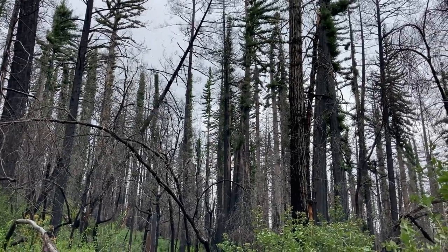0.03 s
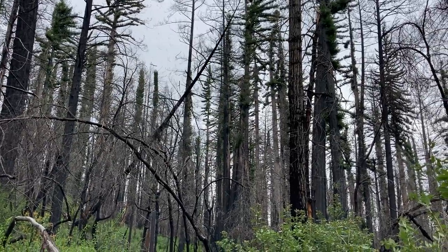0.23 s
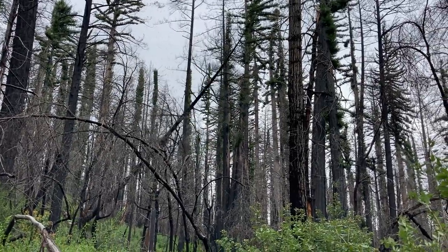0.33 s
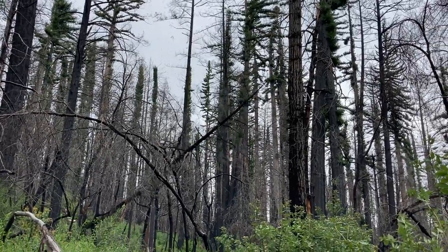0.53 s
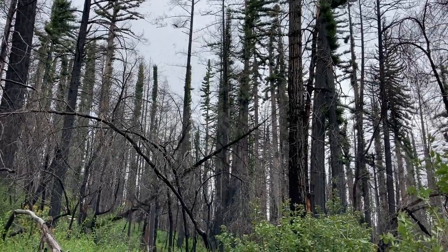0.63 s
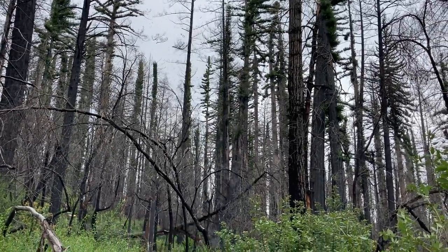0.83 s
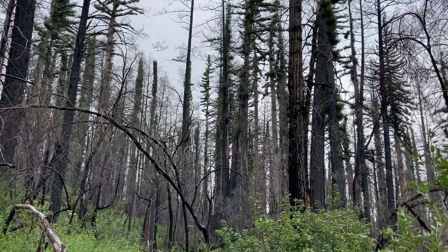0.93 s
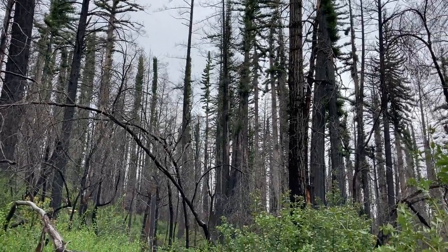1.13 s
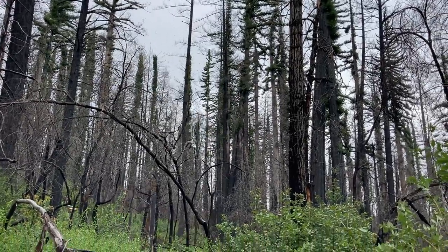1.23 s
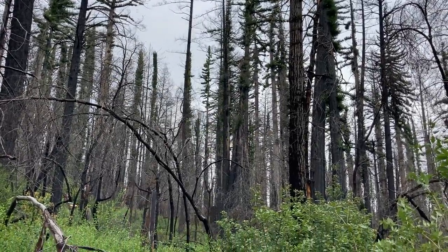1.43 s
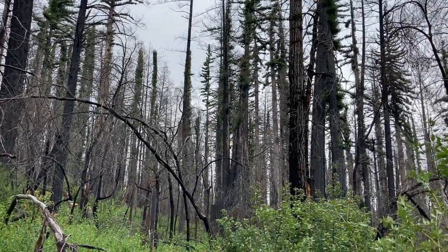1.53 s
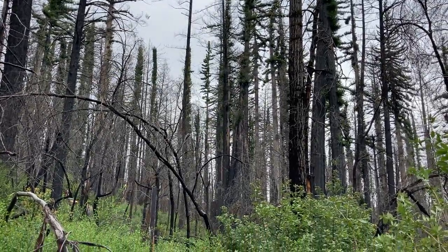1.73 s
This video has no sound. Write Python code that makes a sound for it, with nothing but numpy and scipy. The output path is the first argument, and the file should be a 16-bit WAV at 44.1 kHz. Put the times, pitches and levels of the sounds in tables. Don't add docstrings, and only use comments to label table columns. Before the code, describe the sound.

A dead tree falls in a forest. Faint rustling and small snaps open it; from 0.2 seconds cracks thicken, loudest and sharpest around 0.38 and 0.54, with hollow trunk knocks. Crackling brush continues; branches break again from 0.74, strongly near 0.9. At about 1.2 the trunk lands with a deep thud, bounces duller until 1.5, then fades into soft rustle. Short woodland echo, left-weighted stereo.

```python
import sys
import numpy as np
from scipy import signal
from scipy.fft import rfft, irfft, next_fast_len
from scipy.io import wavfile
from scipy.ndimage import uniform_filter1d

SR = 44100
rng = np.random.default_rng(int(sys.argv[2]) if len(sys.argv) > 2 else 0)


def unload_audio(sound):
    columns = np.transpose(np.atleast_2d(sound))
    steps = np.round(np.clip(columns, -1, 1) * 32767)
    wavfile.write(sys.argv[1], SR, steps.astype(np.int16))


def to_linear_factor(level_db):
    exponent = np.asarray(level_db, float) / 20
    return 10 ** exponent


N = 79380


def evened(x):
    return x / np.sqrt(np.mean(x ** 2) + 1e-20)


def read(points, hz):
    f, value = np.transpose(points)
    return np.interp(np.log(hz + 1), np.log(f + 1), value)


def add(mix, s, sound):
    part = mix[round(s * SR):][:len(sound)]
    part += sound[:len(part)]


def colour(x, gain):
    size = next_fast_len(N + 4096)
    hz = np.fft.rfftfreq(size, 1 / SR)
    return irfft(rfft(x, size) * gain(hz), size)[..., :N]


# t/s, brush crackle level/dB, brightness level/dB, trunk groan level/dB
FALL_COURSE = [(0, -41, -3, -42.5), (0.168, -39.5, 0, -41), (0.219, -31, 3, -38.5), (.32, -31, 6.5, -33.5),
               (.45, -29, 4, -45), (.66, -27, -0.5, -40), (.79, -32, 2, -43.5), (.85, -27, 4, -28),
               (.97, -32, 5, -37), (1.02, -32, 8, -32.5), (1.169, -23, -0.5, -30.5),
               (1.208, -23.5, 0.5, -13), (1.29, -28.5, 1, -51), (1.4, -29, -6, -31.5),
               (1.582, -33.5, -7, -28), (1.8, -41.5, -6.5, -35.5)]


def control(axis):
    table = np.array(FALL_COURSE)
    return np.interp(np.arange(N) / SR, table[:, 0], table[:, axis])


# f/Hz, level/dB
BRUSH_SPECTRUM = [(60, -16), (250, 7), (900, 5.5), (2500, -1.5), (4200, -12), (6000, -21.5), (12000, -28.5),
                  (16000, -47)]
BRUSH_DB, RUSTLE_DB, USUAL_BRIGHT_DB, CLUMP_DB = 5, 3, -11, 1.6
TWIGS_PER_S, TWIG_SPREAD_DB, TWIG_CYCLES = 4000, 3.0, 2.5


def brush():
    clumps = uniform_filter1d(rng.standard_normal(N), 500)
    clumps = evened(uniform_filter1d(clumps, 500))
    size = to_linear_factor(TWIG_SPREAD_DB * np.minimum(rng.exponential(1, N), 3))
    size = size * (rng.random(N) < TWIGS_PER_S / SR)
    kind = rng.integers(0, 24, N)
    t = np.arange(1500) / SR
    twigs = np.zeros(N)
    for k, hz in enumerate(np.geomspace(250, 14000, 24)):
        grain = np.exp(-t * hz / TWIG_CYCLES) * np.sin(2 * np.pi * hz * t)
        grain = grain / np.linalg.norm(grain) * np.sqrt(hz)
        twigs += signal.oaconvolve(size * (kind == k), grain)[:N]
    mix = evened(twigs) + to_linear_factor(RUSTLE_DB) * rng.standard_normal(N)
    full = colour(mix, lambda hz: to_linear_factor(read(BRUSH_SPECTRUM, hz)))
    treble = colour(full, lambda hz: 1 / (1 + (4500 / (hz + 1)) ** 4))
    bright = full + (to_linear_factor(control(axis=2) - USUAL_BRIGHT_DB) - 1) * treble
    return to_linear_factor(BRUSH_DB + control(axis=1) + CLUMP_DB * clumps) * bright / full.std()


# f/Hz, level/dB
GROAN_SPECTRUM = [(25, -9), (50, -10.5), (75, -2.5), (110, -4.5), (200, -6), (320, -8.5), (600, -45.5)]
GROAN_DB = 0.5


def groan():
    rumble = colour(rng.standard_normal(N), lambda hz: to_linear_factor(read(GROAN_SPECTRUM, hz)))
    return to_linear_factor(GROAN_DB + control(axis=3)) * evened(rumble)


SNAP_DB, TICK_DB, TEAR_DB, TICK_S = 1, 6.5, -12.5, 0.00043
SPLINTERS, RING_CYCLES, SPREAD_OCT = 14, 2.3, 1.3


def snap(level_db, ring_hz, treble_db, length):
    luck = rng.random((SPLINTERS, 3))
    hiss = rng.standard_normal(4000)
    t = np.arange(1600) / SR
    body, edge = np.zeros(4000), np.zeros(4000)
    length = np.clip(length, .002, .03)
    for k, (when, size, detune) in enumerate(luck):
        hz = ring_hz * 2 ** (SPREAD_OCT * (detune - .4) * (k % 3 > 0))
        late = (k > 0) * when * length
        force = (.5 + .5 * size) * np.exp(-late / length) * (-1) ** k
        force *= min(0.22 + 4 * late / length, 1)
        ring = np.exp(-t * hz / RING_CYCLES) * np.sin(2 * np.pi * hz * t)
        tick_hz = 3500 + 9000 * detune ** 2.45
        tick = np.exp(-t / TICK_S) * np.sin(2 * np.pi * tick_hz * t)
        add(body, late, force * ring)
        add(edge, late, (force + (k == 0)) * tick)
    u = np.arange(4000) / SR / length
    fade = np.exp(-1.5 * u) * np.minimum(6 * u, 1)
    tear = signal.lfilter([1], [1, -np.exp(-4 * np.pi * ring_hz / SR)], hiss)
    body = body / abs(body).max() + to_linear_factor(TEAR_DB) * evened(tear) * fade
    edge = edge / abs(edge).max() + 0.16 * hiss[::-1] * fade
    return to_linear_factor(level_db + SNAP_DB) * (body + to_linear_factor(treble_db + TICK_DB) * edge)


# t/s, peak level/dB, ring f/Hz, treble level/dB, length/s
LIMB_SNAPS = [(.064, -21.5, 1160, -10, 0.0048), (.105, -34.5, 1490, 3, 0.0078),
              (.144, -33.5, 3570, 2, 0.0046), (.188, -24, 1160, -7.5, 0.0047), (.207, -19, 1140, -5, .01),
              (.254, -12, 2420, -4, 0.007), (.268, -17, 3700, -13, 0.0032), (.28, -24, 4140, -7, 0.0016),
              (.288, -19.5, 3440, 3, 0.0031), (.2975, -11.5, 1080, 2.5, 0.007),
              (.327, -14.5, 2160, -23, 0.006), (.374, -6.5, 1560, -17, 0.0058),
              (.379, -3, 2550, -13.5, 0.0031), (.384, -4, 1600, -14, 0.003), (.388, -9, 2490, -10, .007),
              (.403, -15, 2330, -20, 0.0037), (.44, -11.5, 2230, -12, 0.0044),
              (.488, -23, 1500, -11, 0.0044), (.4975, -16.5, 2320, -4, 0.0029),
              (.4995, -13, 2070, -30, 0.0032), (.5377, -12.5, 2400, 0, .002), (.539, -3, 1937, -21, 0.008),
              (.554, -13, 2370, -36, 0.0047), (.62, -8.5, 1270, -36, 0.011), (.648, -11, 2040, -16, .004),
              (0.74, -16, 3000, -34, 0.0045), (0.806, -15, 1320, -15, 0.0063),
                 (0.847, -15, 1340, -11.5, 0.013), (.864, -16, 1670, -13, 0.0033),
                 (0.885, -5, 1500, -11, 0.0033), (0.906, -6, 1870, -29, .011),
                 (0.932, -14, 1160, -19, 0.0087), (0.962, -12, 2240, -8, 0.003),
                 (0.972, -9, 2010, -30, 0.0039), (0.978, -14.5, 1380, -14, 0.0065),
                 (0.99, -13.5, 1960, -8, 0.0047), (1.034, -15, 3000, -29, 0.005),
                 (1.058, -13, 1840, -22, 0.0056), (1.063, -12, 1110, -10, 0.0066),
                 (1.09, -16, 1640, -28, 0.0068), (1.13, -11, 900, -29, 0.01),
                 (1.163, -13.5, 1120, -34, .01), (1.175, -8, 2230, -32, 0.0083),
                 (1.187, -3.5, 1830, -40, 0.0066), (1.2, -5, 915, -42, 0.00813),
                 (1.217, -10.5, 1080, -27, 0.013), (1.258, -11.5, 1870, -25, 0.0078),
                 (1.306, -13, 800, -28, 0.0167), (1.397, -13.5, 1270, -28, 0.00397),
                 (1.6252, -17.5, 1850, -23, .005)]


def breaking_limbs():
    limbs = np.zeros(N)
    for s, *settings in LIMB_SNAPS:
        add(limbs, s, snap(*settings))
    return limbs


THUD_DB, THUD_OVERTONE = 2, 0.19
THUD_SAG, THUD_WOBBLE, THUD_LUMP_DB = .06, .08, 1.5


def blow(level_db, pitch_hz, length):
    u = np.arange(0, length, 1 / SR) / length
    luck = rng.standard_normal((32, 2))
    cycle = u * length * pitch_hz
    wobble, lumps = (np.interp(cycle, np.arange(len(row)), row) for row in luck.T)
    pitch = pitch_hz * (1 + THUD_SAG * (1 - 2 * u) + THUD_WOBBLE * wobble)
    turns = np.cumsum(pitch) / SR
    wave = np.sin(2 * np.pi * turns) - THUD_OVERTONE * np.cos(4 * np.pi * turns)
    swell = abs(np.sin(np.pi * u)) ** 0.68
    return to_linear_factor(level_db + THUD_DB + THUD_LUMP_DB * lumps) * swell * wave


# t/s, peak level/dB, pitch f/Hz, length/s
TRUNK_KNOCKS = [(.197, -22, 332, 0.019), (.21, -24, 279, 0.022), (.256, -21.5, 291, 0.02),
                (.284, -24.5, 296, 0.026), (.298, -18, 254, 0.021), (.3, -27, 81.4, 0.04),
                (.328, -21, 192, 0.015), (.357, -23, 219, 0.025), (0.374, -13, 300, 0.019),
                (.388, -21.5, 121, 0.026), (.393, -20, 304, 0.019), (.41, -15.5, 253, 0.022),
                (.4175, -6, 758, 0.0049), (.455, -23, 209, 0.031), (.479, -20, 186, 0.019),
                (0.4988, -15.5, 1284, .006), (0.506, -22.5, 114, 0.034), (.565, -25.5, 83, 0.037),
                (.61, -26, 192, .018), (.64, -22.5, 292, 0.031), (.671, -25, 286, 0.017),
                (.68, -29, 88, 0.037), (.73, -27.5, 70.5, 0.047), (.797, -26, 74.4, 0.026),
                (.83, -26, 443, 0.016), (.84, -21, 111, 0.016), (.883, -21.5, 272, 0.013),
                (.9, -25, 295, 0.021), (.928, -24.5, 400, 0.027), (.978, -33, 165, 0.026)]


def knocks():
    trunk = np.zeros(N)
    for s, *settings in TRUNK_KNOCKS:
        add(trunk, s, blow(*settings))
    return trunk


# t/s, peak level/dB, pitch f/Hz, length/s
GROUND_THUDS = [(1.115, -23, 96, 0.031), (1.139, -19, 114, 0.03), (1.161, -20, 78, 0.024),
                (1.185, -15, 108, .02), (1.19, -14, 357, .022), (1.207, -12, 167, 0.012),
                (1.217, -11.5, 117, .018), (1.227, -8, 283.6, 0.0185), (1.231, -7, 193, 0.0192),
                (1.244, -5.5, 95.7, 0.027), (1.255, -13, 171, 0.012), (1.279, -10, 60, .03),
                (1.315, -22.5, 177, 0.029), (1.329, -15.5, 88.5, 0.017), (1.358, -11, 97, 0.02),
                (1.379, -11.5, 79.4, 0.0205), (1.428, -12.5, 91, 0.028), (1.458, -29, 73, 0.03),
                (1.482, -20.5, 68, 0.034), (1.518, -17.5, 75, 0.034), (1.581, -25.5, 67.4, .055),
                (1.678, -30.5, 100, 0.043), (1.708, -26.5, 62, .036), (1.75, -32.5, 97, 0.048)]


def thuds():
    trunk = np.zeros(N)
    for s, *settings in GROUND_THUDS:
        add(trunk, s, blow(*settings))
    return trunk


# f/Hz, t/s
FOREST_DECAY = [(100, 0.63), (1000, 0.64), (4000, 0.57), (12000, 0.48)]


def forest(x):
    taps = np.zeros((2, SR // 2))
    at = np.arange(200, SR // 2 - 20, 20)
    at = at + rng.integers(0, 20, (2, len(at)))
    np.put_along_axis(taps, at, rng.choice([-1., 1.], at.shape), 1)
    hz, t, z = signal.stft(taps, SR, nperseg=256)
    decay = to_linear_factor(-60 * t / read(FOREST_DECAY, hz)[:, None])
    tail = signal.istft(z * decay, SR, nperseg=256)[1]
    return signal.fftconvolve(x[None], tail / np.linalg.norm(tail[0]), axes=1)[:, :N]


SCATTER_S = .04


def scatter(x):
    late = np.cumsum(rng.random(400)) * 2 * np.pi * SCATTER_S * SR / 800
    grid_hz = np.linspace(0, SR / 2, 400)
    return colour(x, lambda hz: np.exp(-1j * np.interp(hz, grid_hz, late)))


ECHO_DB, SNAP_ECHO_DB, THUD_ECHO_DB = -9.5, -8, -10.5


def scene():
    bed = brush() + groan()
    limbs = breaking_limbs()
    trunk = knocks() + thuds()
    wet = forest(to_linear_factor(ECHO_DB) * bed + to_linear_factor(SNAP_ECHO_DB) * limbs + to_linear_factor(THUD_ECHO_DB) * trunk)
    heard = limbs + trunk + bed + wet[0]
    return np.array([heard, scatter(heard - .5 * wet[0] + .5 * wet[1])])


# f/Hz, level/dB
RIGHT_SHADE = [(120, -12), (300, -6), (950, -5), (1450, -9.5), (1900, -18.5), (4650, -15), (5300, -6),
               (6500, -.3)]
# f/Hz, phase/rad
RIGHT_PHASE = [(60, 1.5), (700, 1.7), (1600, .85), (2000, 2.0), (2600, 3.9), (4200, 6.7), (5200, 9.9),
               (6750, 12.57)]
# f/Hz, shared amplitude/1
COHERENCE = [(60, .75), (300, .85), (1500, .85), (2200, .55), (4600, .45), (6000, .6), (6800, .9),
             (15000, .86)]
PORT_LEAD_S, LEAD_FROM_HZ = .000222, 6750


def ports(dry):
    def same(hz):
        return np.clip(read(COHERENCE, hz), 0, 1)

    def turn(hz):
        return read(RIGHT_PHASE, hz) + 2 * np.pi * PORT_LEAD_S * np.maximum(hz - LEAD_FROM_HZ, 0)

    right = colour(dry[0], same) + colour(dry[1], lambda hz: np.sqrt(1 - same(hz) ** 2))
    right = colour(right, lambda hz: to_linear_factor(read(RIGHT_SHADE, hz)) * np.exp(1j * turn(hz)))
    return colour(np.array([dry[0], right]), lambda hz: 1 / (1 + (35 / (hz + 1)) ** 4))


LIMIT, KNEE = .88, .65


def limiter(pair):
    over = np.maximum(abs(pair) - KNEE, 0)
    bent = (LIMIT - KNEE) * np.tanh(over / (LIMIT - KNEE))
    return np.sign(pair) * (np.minimum(abs(pair), KNEE) + bent)


GATE_FROM_HZ, GATE_UNDER_DB, GATE_CREST_DB = 6000, 6, 10.3
FAINT_FROM_HZ, FAINT_DB, STEADY_EDGE_HZ, GRID = 13000, -84, 15300, 702


def gate(pair):
    pair = np.pad(pair, ((0, 0), (GRID, 0)))
    mid_side = np.array([pair[0] + pair[1], pair[0] - pair[1]]) / 2
    hz, t, z = signal.stft(mid_side, SR, nperseg=2048, noverlap=1024)
    power = uniform_filter1d(abs(z) ** 2, size=32, axis=1)[:, np.arange(1025) // 16 * 16]
    band_db = 10 * np.log10(power + 1e-20)
    hz = hz[:, None]
    under_db = GATE_UNDER_DB / np.where(hz > FAINT_FROM_HZ, 2, 1)
    weak = (band_db < band_db[::-1] - under_db) & (hz > GATE_FROM_HZ)
    faint = (band_db < FAINT_DB) & (hz > FAINT_FROM_HZ) | (hz > STEADY_EDGE_HZ)
    fast = uniform_filter1d(np.diff(pair[0], prepend=0) ** 2, size=128)
    frames = np.pad(fast, (1536, 3072), "edge")
    frames = frames[np.arange(len(t))[:, None] * 1024 + np.arange(2048)]
    steady = frames[:, 1024:].max(1) < to_linear_factor(2 * GATE_CREST_DB) * frames[:, :1024].mean(1)
    kept = z * ~((weak | faint) & steady)
    mid, side = signal.istft(kept, SR, nperseg=2048, noverlap=1024)[1][:, GRID:GRID + N]
    return np.array([mid + side, mid - side])


def low_pass(x):
    return signal.sosfilt(signal.butter(12, 16830, fs=SR, output="sos"), x)


def record(dry):
    pair = limiter(ports(dry))
    pair = colour(pair, lambda hz: 1 / (1 + (hz / 16000) ** 80))
    return low_pass(gate(pair))


dry = scene()
out = record(dry)
unload_audio(out)
```